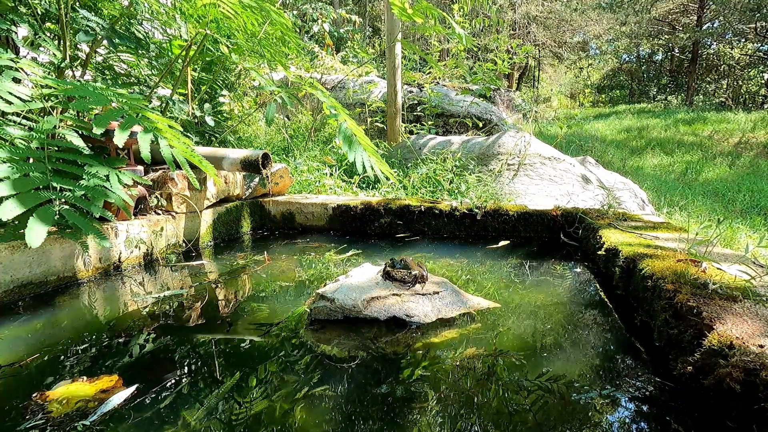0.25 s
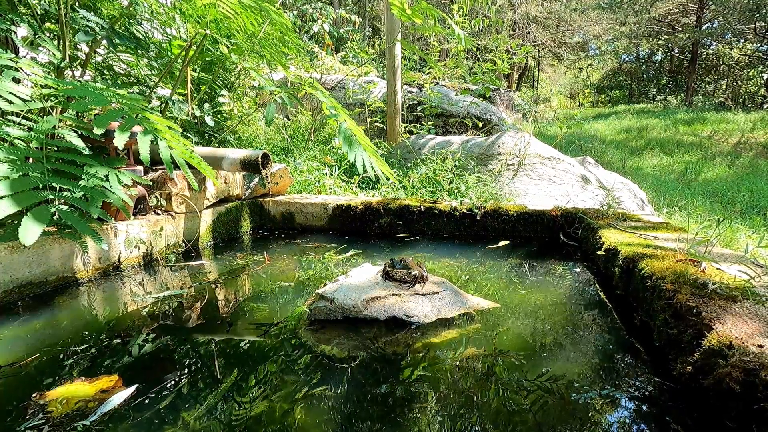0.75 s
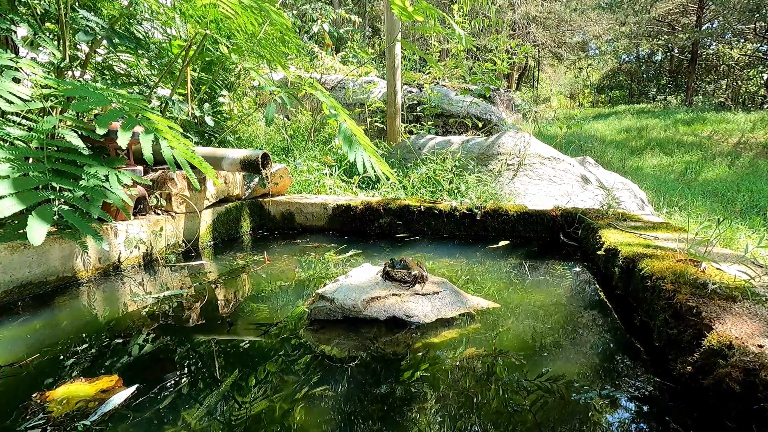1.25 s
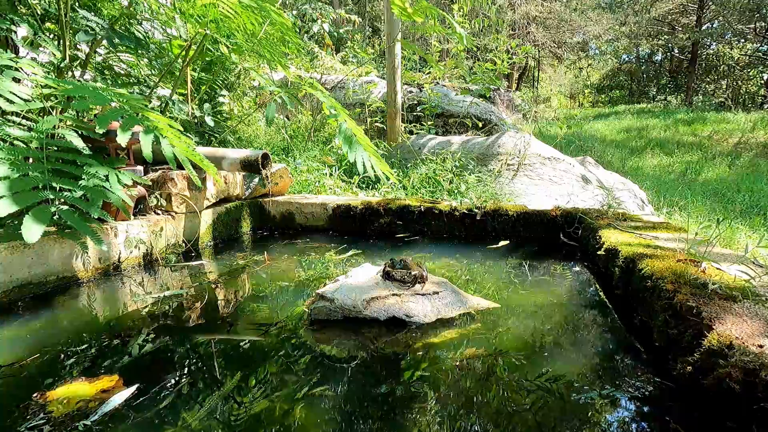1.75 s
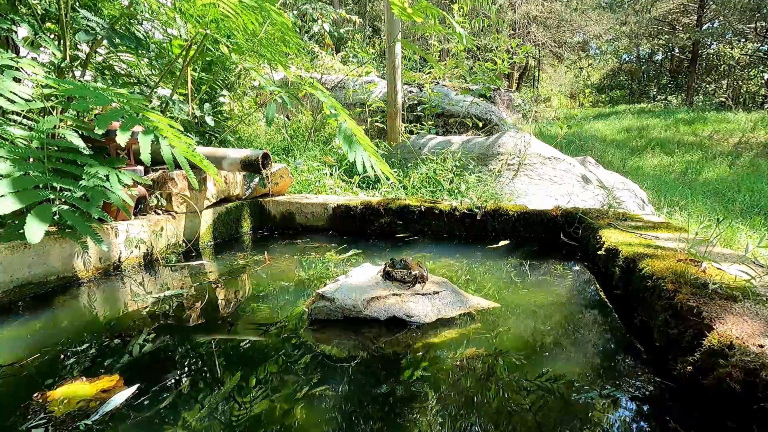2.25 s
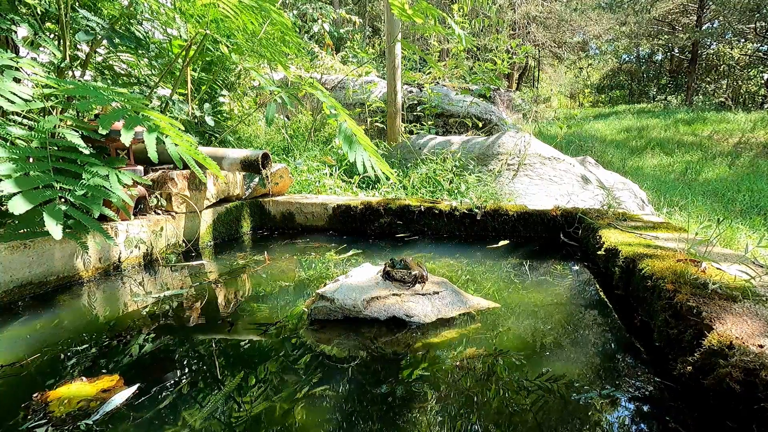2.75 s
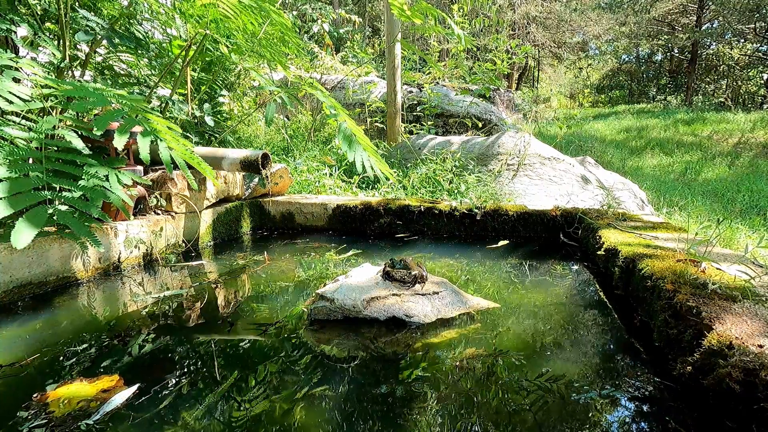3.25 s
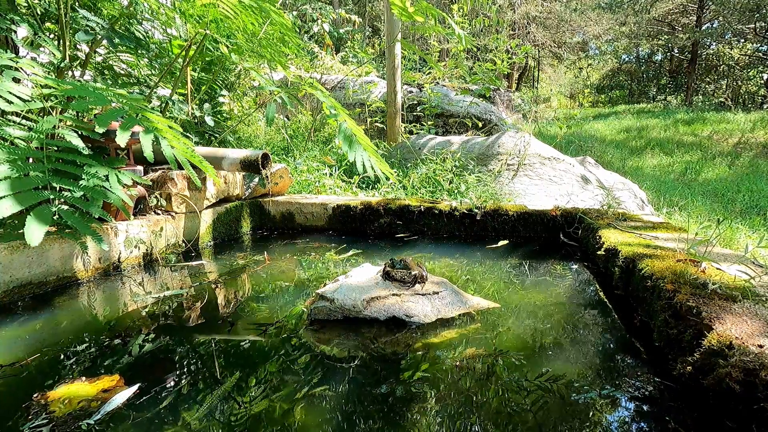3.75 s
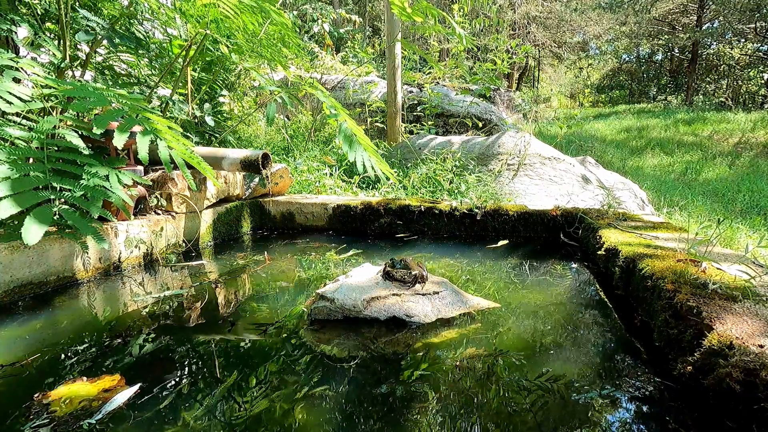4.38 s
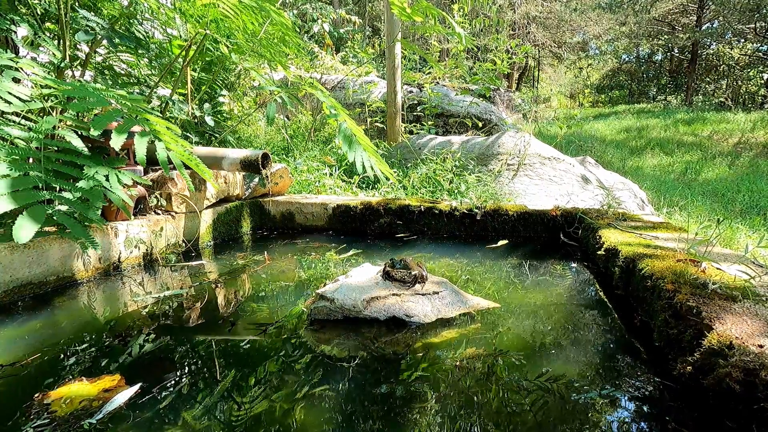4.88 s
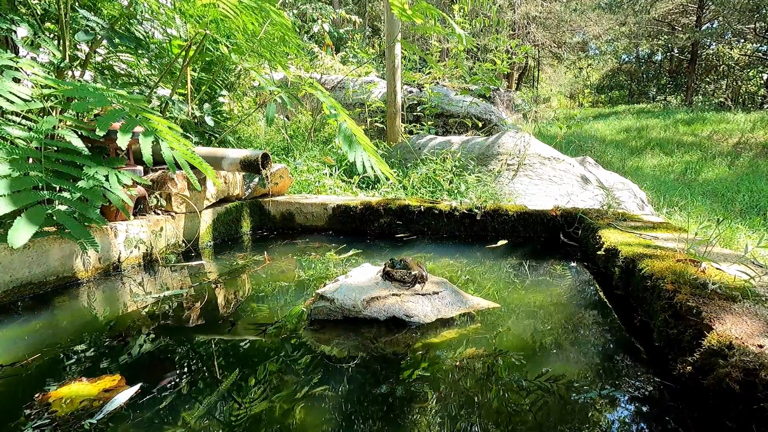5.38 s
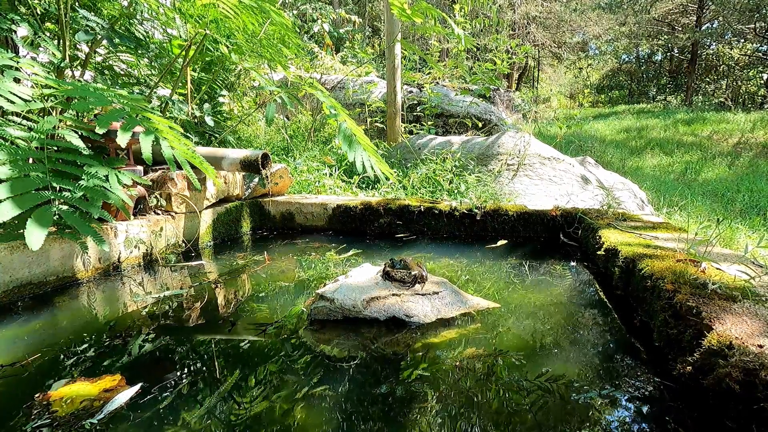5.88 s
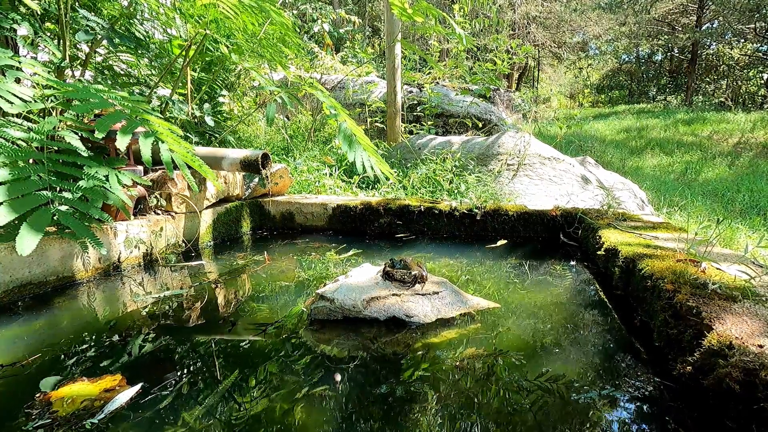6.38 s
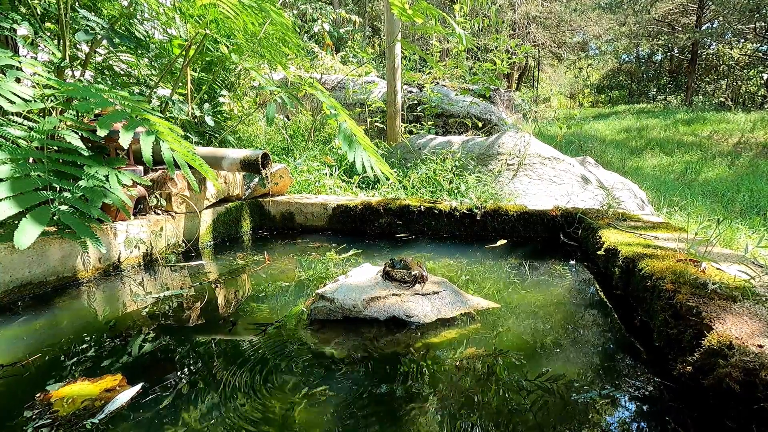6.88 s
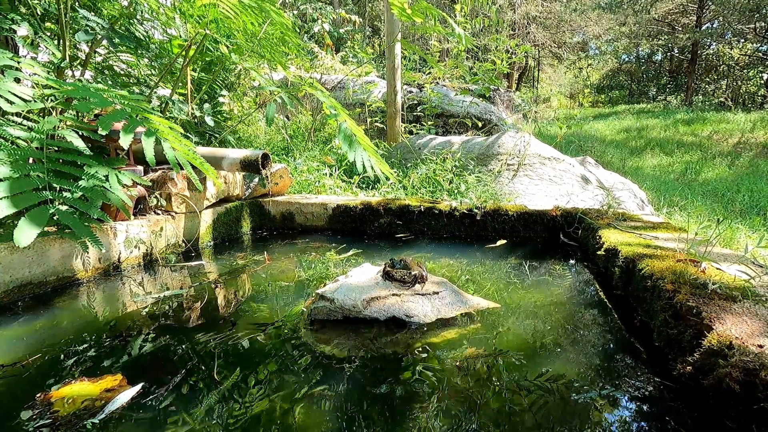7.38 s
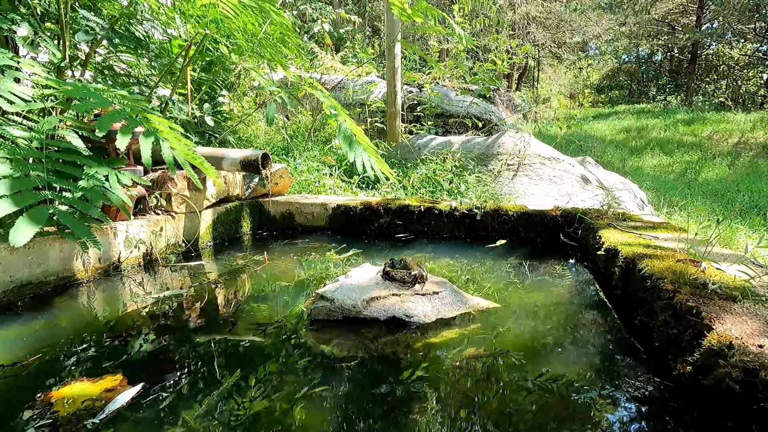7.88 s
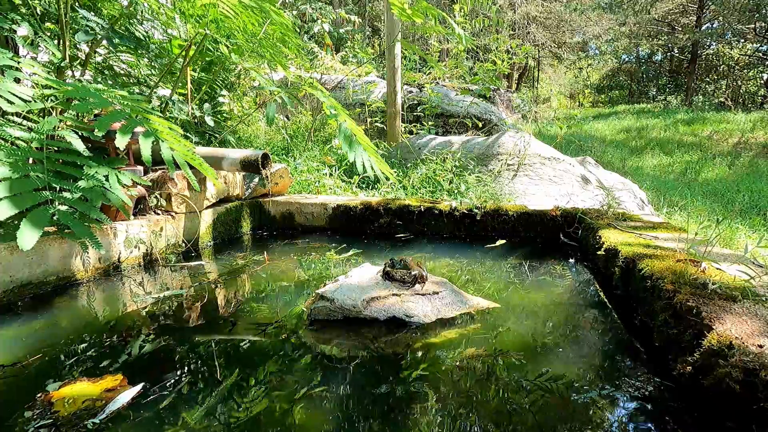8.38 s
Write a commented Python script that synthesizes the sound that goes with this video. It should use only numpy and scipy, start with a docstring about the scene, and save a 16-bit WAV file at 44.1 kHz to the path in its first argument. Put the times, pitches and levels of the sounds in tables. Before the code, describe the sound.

A summer woodland garden, heard in wide stereo outdoors for about 8.6 seconds. A dense, high insect chorus runs throughout: fine cricket ticks and trills mostly on the left, a smooth hiss of distant cicadas and a dim drone behind. A nearer cicada makes a dry, rapidly rattling buzz, swelling and easing near 0, 1.3, 2.5, 3.7, 4.6, 5.6, 6.7, 7.8 and 8.6 s; early swells are weaker with deeper lulls, later ones fuller over a steadier drone. Very faint scraped chirps repeat from 0.8 to 4.5 s, then slightly lower, clearer ones from 7.5 s. A thin katydid rasp creeps in at intervals, notably around 3.2-3.9 and 5.9-6.7 s. One tiny, high bird chip comes at 4.8 s. Low wind rumbles and thuds irregularly against the microphone, buffeting hardest around 6-6.6 s, with another gust at 7.3 s.

```python
"""A summer garden pond in woodland. From the start a cicada of buckling ribs swells and fades about once
a second, crickets tick and trill mostly on the left as short sinking wing tones, far cicadas and a drone
blur into coloured noise, wind rumbles on a stereo microphone as wavering low noise and gusts, and a katydid
rasps in spells of bunched clicks. Soft scraped chirps join within the first second, with a pause before
the last ones; halfway through, a small bird gives one chip, a short gliding tone."""
import sys
import numpy as np
from scipy import signal
from scipy.fft import rfft, irfft
from scipy.io import wavfile
from scipy.ndimage import uniform_filter1d

SR = 44100
rng = np.random.default_rng(int(sys.argv[2]) if len(sys.argv) > 2 else 0)


def transcribe(u):
    """Save the signal u as a 16-bit wav file named by the first command-line argument.

    u: samples, shape (n,) or (channels, n), limited to [-1, 1]; the rate is SR.
    q: integer samples, one column per channel.
    """
    v = np.clip(np.atleast_2d(u).T, -1, 1)
    q = np.round(v * 32767).astype(np.int16)
    wavfile.write(sys.argv[1], SR, q)


N = 380573
T = np.arange(N) / SR  # time of each sample [s]
HZ = np.arange(N // 2 + 1) * SR / N  # frequency of each bin [Hz]

# Likeness of the two ports: (frequency [Hz], correlation [0-1])
PORT_LIKENESS = [(30, .9), (100, .96), (140, .94), (250, .85), (510, .6), (860, .54), (1300, .64),
                 (2600, .53), (4000, .79), (5800, .88), (7000, .7)]
# Phase by which the left port leads: (frequency [Hz], lead [rad])
PORT_LEAD = [(60, 0), (170, -.06), (860, -.46), (2500, -.7), (4000, -.4), (5700, -.24), (7000, -.3)]
# Tilt between the ports: (frequency [Hz], left minus right [dB])
PORT_LEAN = [(60, 0.5), (250, -2), (520, -4.5), (1200, 1.5), (2600, 0), (4000, 1), (5700, 0), (6800, 2)]

# Colour of the cicada's membrane: (frequency [Hz], relative level [dB])
TYMBAL_COLOUR = [(4300, -26.5), (5000, 1.5), (5500, 4), (5900, 1.5), (6300, 4.5), (6900, 2), (7500, 1),
                 (8500, -8), (9600, -20), (12000, -98)]
# Resonances of the taut membrane: (frequency [Hz], width [Hz], relative level [dB])
TYMBAL_MODES = [(5830, 800, 0), (5880, 55, 7), (6110, 130, 1), (5540, 90, -2), (6330, 80, -4),
                (6740, 80, -7), (7100, 150, -5), (4870, 200, -6), (5120, 70, -7), (4200, 70, -8),
                (4070, 60, -4)]
# Colour of the hollow abdomen: (frequency [Hz], relative level [dB])
ABDOMEN_COLOUR = [(2800, -40), (3400, -11), (3900, 0.5), (4500, -0.5), (5000, -7), (5500, -35), (6200, -44),
                  (8000, -92)]
# Cicada drone between swells, before lulls: (time [s], level [dB])
CICADA_DRONE = [(0, -66), (.9, -54), (1.9, -51.5), (3.0, -52.5), (4.1, -50.5), (5.0, -50.5), (5.9, -50.5),
                (7.0, -47.5), (7.35, -50.5), (8.05, -49.5), (8.3, -48.5), (8.63, -62)]
# Cicada swells: (end [s], length [s], level at the end [dB], climb up to the end [dB],
# depth of the lull after it, negative for a lift [dB], extra abdomen tone [dB], extra treble [dB])
CICADA_SWELLS = [(0.082, .3, -51.5, -2, 11, .1, -.5), (1.304, 0.097, -50, -3, 20, -2.5, -4),
                 (2.47, 0.22, -46.5, 5.5, 10, .5, -2.5), (3.657, 0.27, -48.5, -3, 8, -1.3, -3),
                 (4.603, 0.31, -43.5, 5.5, 5, 1, -1.5), (5.588, 0.24, -43, 2, -2, -0.7, -1.8),
                 (6.71, 0.23, -44.5, 0.5, 0, -1.5, -2), (7.782, 0.23, -44, 2.5, -2, 0, 0),
                 (8.7, 0.14, -47.5, 0.5, 1, 0, -1)]
# Single crickets; the 7500 Hz row is a nearly continuous faint tone, its stroke rate arbitrary:
# (wing pitch [Hz], fall in a stroke [Hz], stroke rate [1/s], middle of first stroke [s], stroke length [s])
CRICKET_SONGS = [(7625, 30, 13.32, .0143, .020), (7600, 40, 13.89, .0194, .022),
                 (7500, 40, 15.7, .03, .062), (8290, 200, 58.6, .007, .010), (8355, 100, 59.37, .013, .012),
                 (8500, 100, 30.3, .01, .016), (8140, 60, 27.7, .01, .02), (7340, 50, 20.3, .02, .026)]
# Where each single cricket sits: (mean level [dB], left minus right [dB])
CRICKET_SEATS = [(-63, 9), (-66, -3), (-68, 7), (-59, 9), (-68, -2), (-68, 3), (-64, 7), (-69, 6)]
# Colour of the far crickets: (frequency [Hz], relative level [dB])
CROWD_COLOUR = [(6500, -30.5), (7000, -8), (7250, -9), (7330, 2.5), (7430, -1), (7500, 2.5), (7560, -3.5),
                (7620, -8.5), (7720, -1.5), (7800, 3.5), (7970, -1), (8120, 0.5), (8220, -3.5),
                (8310, -2.5), (8430, -2), (8490, -4), (8600, -10.5), (8850, -15), (9000, -23.5),
                (9250, -21), (9500, -24.5), (9750, -35), (10500, -72)]
# Colour of the cicadas deep in the wood: (frequency [Hz], relative level [dB])
FAR_CICADA_COLOUR = [(2600, -20.5), (3350, -14.5), (3800, -7), (4200, -5), (5000, -5), (5800, -1.5),
                     (7000, -4.5), (8500, -40), (9700, -45), (12000, -90)]
# Their loudness: (time [s], level [dB])
FAR_CICADA_LEVEL = [(0, -53), (1.2, -53), (1.45, -53), (2.3, -58), (2.65, -55), (2.95, -54), (3.4, -54.5),
                    (4.5, -52.5), (6.5, -54), (8.63, -51.5)]
# Colour of the distant drone and leaves: (frequency [Hz], relative level [dB])
FAR_DRONE_COLOUR = [(250, -48), (400, -4.5), (480, -10), (730, -8), (1050, -1), (1350, 1), (1900, -4),
                    (2400, -6), (2900, -6.5), (3600, -5.5), (5000, -35), (8000, -70)]
# Its loudness: (time [s], level [dB])
FAR_DRONE_LEVEL = [(0, -63.5), (2.3, -61), (4.5, -62.5), (6.5, -63), (8.63, -63.5)]
# Steady wind: (time [s], deep rumble [dB], buffeting [dB], brighter flutter [dB])
STEADY_WIND = [(0, -49.5, -59, -61.5), (.7, -50, -56, -62.5), (1.35, -63, -64, -64.5),
               (1.6, -54.5, -57, -60.5), (2.0, -53.5, -60, -62.5), (2.3, -59, -57.5, -61),
               (2.6, -52.5, -56.5, -61.5), (3.2, -53.5, -58.5, -65), (3.9, -53.5, -57, -59.5),
               (4.6, -51, -53.5, -59.5), (5.5, -50, -52, -59), (5.8, -53.5, -59.5, -56.5),
               (6.3, -55.5, -51.5, -54), (6.75, -52, -50.5, -58), (7.0, -55, -57.5, -66),
               (7.6, -47.5, -61.5, -61), (8.2, -51, -58, -61), (8.63, -58.5, -56.5, -60)]
# Gusts on the ports: (middle [s], length [s], deep rumble [dB], buffeting [dB], flutter [dB])
WIND_GUSTS = [(0.175, 0.091, -51, -66, -59.5), (0.315, 0.034, -41.5, -64, -66),
              (0.6, 0.17, -45.5, -71, -75), (0.916, 0.054, -46, -62, -69), (1.16, 0.12, -47.5, -58, -74),
              (1.43, 0.056, -58, -66, -55), (1.637, 0.093, -43.5, -64, -72),
              (1.903, 0.043, -46.5, -60, -61), (2.83, 0.076, -44.5, -84, -62), (3.323, 0.15, -46, -63, -79),
              (3.559, 0.023, -44, -69, -76), (3.778, 0.28, -48, -63, -75), (4.258, 0.064, -44, -63, -56),
              (4.756, 0.23, -71, -54.5, -56.5), (5.038, 0.08, -48, -63, -78),
              (4.463, 0.16, -48.5, -51.5, -73), (4.583, 0.088, -50, -64, -66),
              (5.404, 0.075, -53, -50, -59), (5.7, 0.053, -71, -64, -54), (5.976, 0.11, -51, -45.5, -71),
              (6.084, 0.06, -44, -49.5, -49.5), (6.161, 0.069, -64, -40, -53),
              (6.342, 0.06, -45.5, -62, -51.5), (6.467, 0.14, -49, -40.5, -51.5),
              (6.574, 0.077, -60, -41.5, -64), (7.308, 0.19, -43.5, -46, -53),
              (8.071, 0.044, -43, -59, -55.5), (8.235, 0.077, -46, -65, -75)]
# Colour of the largest eddies: (frequency [Hz], relative level [dB])
RUMBLE_COLOUR = [(10, -8.5), (30, 3), (60, 3.5), (90, -2.5), (130, -28), (250, -72), (600, -130)]
# Colour of the middling eddies: (frequency [Hz], relative level [dB])
BUFFET_COLOUR = [(40, -67), (80, -1.5), (105, -3.5), (140, 2), (180, -6.5), (240, -22), (500, -75),
                 (1000, -130)]
# Colour of the smallest eddies: (frequency [Hz], relative level [dB])
FLUTTER_COLOUR = [(80, -38), (170, -6.5), (210, 1.5), (300, -3.5), (370, -13.5), (480, -21.5), (700, -38),
                  (1500, -120)]
# How long one eddy lasts: (rumble [s], buffeting [s], flutter [s])
EDDY_LENGTHS = (.05, .03, .02)
# Colour of the thin high rasp: (frequency [Hz], relative level [dB])
RASP_COLOUR = [(9500, -39), (10800, -3), (11400, 0), (12300, 2), (13200, -5), (14300, 2), (15200, -1),
               (16500, -29)]
# Spells of thin high rasp; the faint ones near 1.3, 4.6 and 7.8 s go with cicada swells:
# (start [s], end [s], level at the end [dB], climb through the spell [dB])
RASP_SPELLS = [(-.3, .15, -75, .1), (.95, 1.36, -79, -2), (2.1, 2.27, -76, 3), (3.2, 3.85, -71.5, 2.5),
               (4.25, 4.6, -81, 1.5), (5.9, 6.66, -71, 5), (7.5, 7.8, -86, -4), (8.15, 8.45, -78, 4)]
# Soft chirps of two slow singers: (middle [s], length [s], level [dB], pitch [Hz], left minus right [dB])
SOFT_CHIRPS = [(.82, .1, -73, 10200, 0), (1.17, .1, -73, 10200, 0), (1.5, .09, -71, 10300, 0),
               (1.87, .08, -69, 10300, 0), (2.14, .1, -71, 10250, 0), (2.45, .09, -75, 10250, 0),
               (2.78, .1, -72, 10300, 0), (3.08, .09, -71, 10350, 1), (3.35, .07, -72, 10300, 0),
               (3.8, .08, -71, 10200, 0), (4.11, .07, -70, 10350, 0), (4.5, .1, -69, 10300, 0),
               (7.51, .05, -66, 9150, 4), (7.71, .055, -61, 9150, 4), (7.93, .05, -65, 9250, 2),
               (8.12, .055, -65, 9250, 4), (8.342, .05, -63.5, 9300, 4), (8.56, .06, -64, 9200, 2)]
# Small bird: (time [s], pitch [Hz], level [dB])
BIRD_CHIP = [(4.782, 8650, -75), (4.79, 8800, -66), (4.80, 8900, -52), (4.812, 8700, -72)]

BUCKLES_HZ = 125.6  # bunches of rib clicks a second
SWELL_ATTACK_S, SWELL_RELEASE_S = 0.097, 0.064
SWELL_TAIL_S, SWELL_TAIL_DB = 0.13, -10  # the snap leaves a weak tail
LULL_DELAY_S, LULL_S = 0.15, 0.11
TREBLE_HZ = 6200  # the membrane's treble lies above this
BODY_DB, BODY_LAG = -8, 0.26  # abdomen tone under the drone; share of each dB of swell it does not follow
BODY_LATE_S = 0.01  # the abdomen sounds on a little after the membrane
CROWD_DB, CROWD_PAN_DB, CROWD_ALIKE = -52, 6.5, 0.2
GRASS_LAG_S = .000406  # the right port is further from the grass
MOTTLE_DB, MOTTLE_WINDOW = 2.0, 768  # spread of the random gains; window [samples]
WIND_WAVER_DB = 1.7
SPELL_RISE_DB_PER_S, SPELL_FALL_DB_PER_S = 25, 90
HISS_DB, TOP_HZ = -76, 15720  # hiss before the top is cut; edge of the cut


def undb(db):
    """Gain of a dB value."""
    return 10 ** (np.asarray(db) / 20)


def unit(x):
    """Scaled to rms 1."""
    return x / np.sqrt(np.mean(x ** 2))


def louder(*db):
    """Level of unrelated sounds heard together: their powers add."""
    return 10 * np.log10(sum(undb(d) ** 2 for d in db))


def pan(db):
    """Channel gains for a left minus right difference."""
    return undb(np.array([[db / 2], [-db / 2]]))


def along(table):
    """Columns of a time table at every sample."""
    s, *columns = np.transpose(table)
    return [np.interp(T, s, c) for c in columns]


def across(table):
    """A frequency table at every bin, read along log frequency."""
    hz, value = np.transpose(table)
    return np.interp(np.log(HZ + 1), np.log(hz), value)


def colour(x, spectrum):
    """Through a smooth spectrum, rms 1."""
    return unit(irfft(rfft(x) * undb(across(spectrum)), N))


def ring(x, modes):
    """Through resonances, each applied twice for steep skirts, rms 1."""
    gain = 0
    for hz, width, db in modes:
        detune = (HZ / hz - hz / (HZ + 1)) * hz / width
        gain = gain + undb(db) / (1 + 1j * detune) ** 2
    return unit(irfft(rfft(x) * gain, N))


def walk(rate):
    """Random levels held 1 / rate s and slewed twice; spread 1."""
    k = int(SR / rate)
    held = np.repeat(rng.standard_normal(N // k + 1), k)
    return unit(uniform_filter1d(uniform_filter1d(held, k), k)[:N])


def ports(near, other):
    """The two microphone ports hear a shared sound plus unrelated scatter, alike by frequency."""
    alike = across(PORT_LIKENESS)
    mid = rfft(near) * np.sqrt(1 + alike)
    side = rfft(other) * np.sqrt(1 - alike)
    half = np.exp(.5j * across(PORT_LEAD)) * undb(across(PORT_LEAN) / 2)
    return irfft(np.array([(mid + side) * half, (mid - side) / half]), N) / np.sqrt(2)


def field(spectrum):
    """Steady wide noise of a given colour, rms 1."""
    return colour(ports(*rng.standard_normal((2, N))), spectrum)


def trees(x, wet, t60):
    """Leaves and trunks scatter a source into a short tail, another one at each port."""
    k = np.arange(int(t60 * SR))
    tail = rng.standard_normal((2, len(k))) * np.exp(-np.log(1000) * k / len(k))  # falls 60 dB
    tail /= np.sqrt(np.sum(tail ** 2, axis=1, keepdims=True))
    scattered = signal.fftconvolve(x[None], tail, axes=1)[:, :N]
    return np.sqrt(1 - wet) * x + np.sqrt(wet) * scattered


def buzz(rate, sharp, uneven):
    """Noise-like clicks bunched once a muscle beat, the beat itself drifting."""
    beat = 2 * np.pi * np.cumsum(rate * (1 + uneven * walk(30))) / SR
    return np.exp(sharp * np.cos(beat)) * rng.standard_normal((2, N))


def effort():
    """Drone, full level and colour of the cicada: each swell sets in, climbs or sinks, then snaps off."""
    drone_db, swells, colours = along(CICADA_DRONE)[0], [], 0
    for end, length, peak_db, climb_db, lull_db, *extra_db in CICADA_SWELLS:
        start, snapped = end - length, end + SWELL_RELEASE_S
        shape = np.interp(T, [start - SWELL_ATTACK_S, start, end, snapped, snapped + SWELL_TAIL_S],
                          [0, undb(-climb_db), 1, undb(SWELL_TAIL_DB), 0])
        swells.append(peak_db + 20 * np.log10(shape + 1e-6))
        colours = colours + np.outer(extra_db, np.clip(shape, 0, 1))
        drone_db = drone_db - lull_db * np.exp(-((T - end - LULL_DELAY_S) / LULL_S) ** 2)
    return drone_db, louder(drone_db, *swells), *colours


def cicada():
    """Tymbal ribs buckle in bunches and ring the membrane and the hollow abdomen."""
    drone_db, level_db, extra_db, treble_db = effort()
    body_db = BODY_DB + level_db - BODY_LAG * (level_db - drone_db) + extra_db + .6 * walk(6)
    clicks = ports(*buzz(BUCKLES_HZ, .24, .05))
    # level of the ringing membrane modes: strongest at full effort
    loudest_db = np.max(CICADA_SWELLS, axis=0)[2]
    modes_db = -8.5 + 0.9 * (level_db - loudest_db)
    membrane = 0.74 * colour(clicks, TYMBAL_COLOUR) + undb(modes_db) * ring(clicks, TYMBAL_MODES)
    treble = irfft(rfft(membrane) / (1 + (TREBLE_HZ / (HZ + 1)) ** 20), N)
    membrane = membrane + (undb(treble_db + .6 * walk(6)) - 1) * treble
    late_body_db = np.interp(T - BODY_LATE_S, T, body_db)
    return undb(level_db) * membrane + undb(late_body_db) * colour(clicks, ABDOMEN_COLOUR)


def strokes(hz, fall_hz, rate, first, length, uneven_db=2, stray_hz=15):
    """Each closing of the wings is a short tone of its own that sinks as the scraper slows."""
    count = np.floor((T - first) * rate + .5)
    since = T - first - count / rate
    u = since / length  # -.5 .. .5 within a stroke
    on = (np.abs(u) < .5) & (count >= 0)
    chance = rng.standard_normal((int(rate * N / SR) + 2, 3))  # one row a stroke
    size, stray, start = chance[count[on].astype(int)].T
    cycles = (hz + stray_hz * stray - fall_hz * u[on] / 2) * since[on] + start
    song = np.zeros(N)
    song[on] = undb(uneven_db * size) * np.cos(np.pi * u[on]) * np.sin(2 * np.pi * cycles)
    return song


def crickets():
    """Single singers, each swaying in level, over a crowd too far to tell apart."""
    singers = 0
    for song, (db, pan_db) in zip(CRICKET_SONGS, CRICKET_SEATS):
        voice = unit(strokes(*song)) * undb(db + 1.1 * walk(1.5))
        singers = singers + pan(pan_db) * trees(voice, .3, .15)
    noise = rng.standard_normal((3, N))  # so many that they melt into a hiss
    crowd = np.sqrt(CROWD_ALIKE) * noise[0] + np.sqrt(1 - CROWD_ALIKE) * noise[1:]
    left, right = singers + pan(CROWD_PAN_DB) * undb(CROWD_DB) * colour(crowd, CROWD_COLOUR)
    return np.array([left, np.roll(right, int(GRASS_LAG_S * SR + .5))])


def distance():
    """Cicadas deep in the wood and a low drone beyond them, blurred to smooth noise."""
    far_cicadas = undb(along(FAR_CICADA_LEVEL)[0]) * field(FAR_CICADA_COLOUR)
    far_drone = undb(along(FAR_DRONE_LEVEL)[0]) * field(FAR_DRONE_COLOUR)
    return far_cicadas + far_drone


def mottle(x):
    """Random gains on short, narrow cells of the sound, same on both channels, give a grainy texture."""
    _, _, cells = signal.stft(x, nperseg=MOTTLE_WINDOW)
    cells = cells * undb(MOTTLE_DB * rng.standard_normal(cells.shape[1:]))
    return signal.istft(cells, nperseg=MOTTLE_WINDOW)[1][:, :N]


def wind():
    """Eddies of three sizes shake the diaphragms, each wavering on its own; a gust pushes at even strength."""
    out = 0
    eddies = RUMBLE_COLOUR, BUFFET_COLOUR, FLUTTER_COLOUR
    for k, (db, eddy) in enumerate(zip(along(STEADY_WIND), eddies)):
        steady = undb(db + WIND_WAVER_DB * walk(12)) * field(eddy)
        gust_power = sum(undb(levels[k]) ** 2 * np.exp(-(2 * (T - s) / length) ** 2)
                         for s, length, *levels in WIND_GUSTS)
        push = field(eddy)
        # evened out over the life of one eddy
        power = uniform_filter1d(np.mean(push ** 2, axis=0), int(EDDY_LENGTHS[k] * SR))
        out = out + steady + np.sqrt(gust_power) * push / np.sqrt(power + .1)
    return out


def katydid():
    """A thin rasp of some ninety wing strokes a second, in spells that creep in and stop short."""
    spells = []
    for start, end, db, climb_db in RASP_SPELLS:
        still_to_climb = climb_db * np.clip((end - T) / (end - start), 0, 1)
        creep_in = SPELL_RISE_DB_PER_S * np.clip(start - T, 0, None)
        stop = SPELL_FALL_DB_PER_S * np.clip(T - end, 0, None)
        spells.append(db - still_to_climb - creep_in - stop)
    level_db = np.max(spells, axis=0) + 1.4 * walk(9)
    return pan(4.2) * undb(level_db) * colour(buzz(87, 0.31, 0.0043), RASP_COLOUR)


def chirps(width_hz=520):
    """Each chirp is a soft swell of uneven scraping round the wing's pitch."""
    out = np.zeros((2, N))
    t = np.arange(SR // 5) / SR
    span = int(SR / width_hz)
    for s, length, db, hz, pan_db in SOFT_CHIRPS:
        noise = rng.standard_normal((2, len(t)))
        scrape = .35 + unit(uniform_filter1d(uniform_filter1d(noise, span), span))
        swell = np.sin(np.pi * np.clip(t / length, 0, 1))
        chirp = pan(pan_db) * undb(db) * swell * scrape * np.sin(2 * np.pi * hz * t)
        k = int((s - length / 2) * SR)
        out[:, k:k + len(t)] += chirp[:, :N - k]
    return out


def bird():
    """One short chip: a tone that arches up and back in pitch, scattered by the trees."""
    hz, db = along(BIRD_CHIP)
    sounding = (T > BIRD_CHIP[0][0]) * (T < BIRD_CHIP[-1][0])
    tone = np.sin(2 * np.pi * np.cumsum(hz) / SR) * undb(db) * sounding
    return pan(4) * trees(tone, 0.37, 0.27)


def scene():
    """Everything as it reaches the two ports."""
    chorus = mottle(cicada() + crickets() + distance())
    return chorus + wind() + katydid() + chirps() + bird()


def record(dry):
    """The preamplifier hisses faintly; a steep low-pass cuts the top."""
    hiss = undb(HISS_DB) * rng.standard_normal(dry.shape)
    low_pass = signal.ellip(14, .2, 70, TOP_HZ, fs=SR, output="sos")
    return signal.sosfilt(low_pass, dry + hiss)


dry = scene()
out = record(dry)
transcribe(out)
```